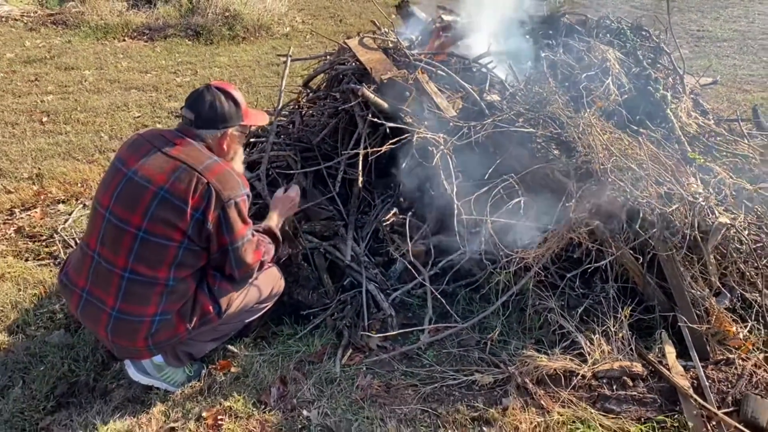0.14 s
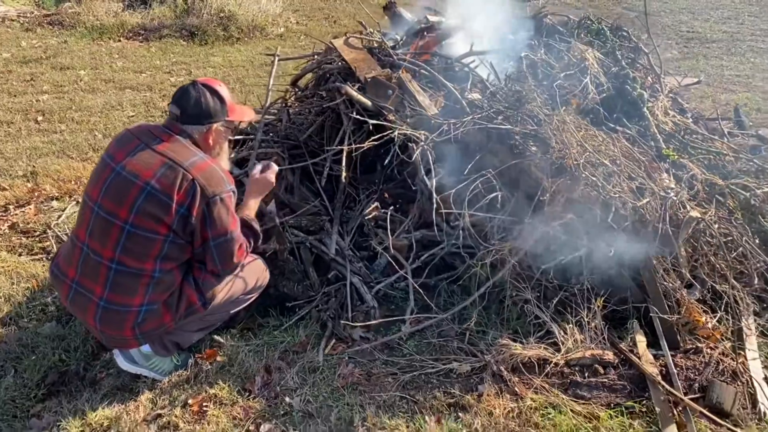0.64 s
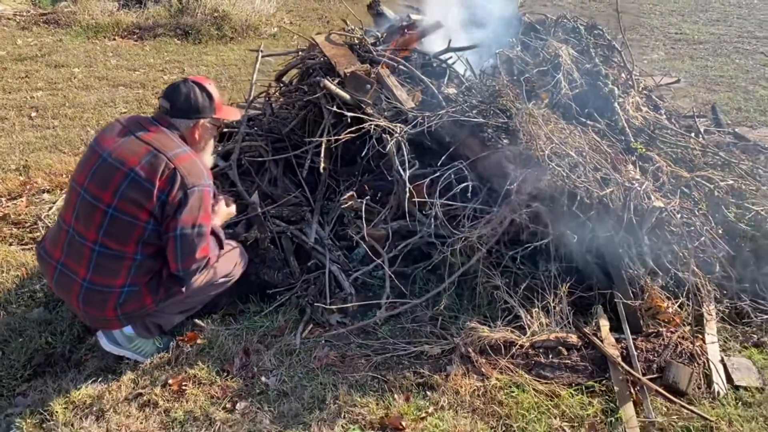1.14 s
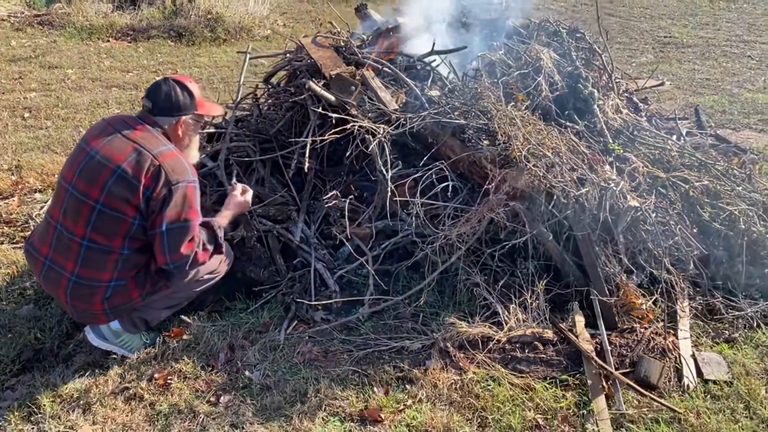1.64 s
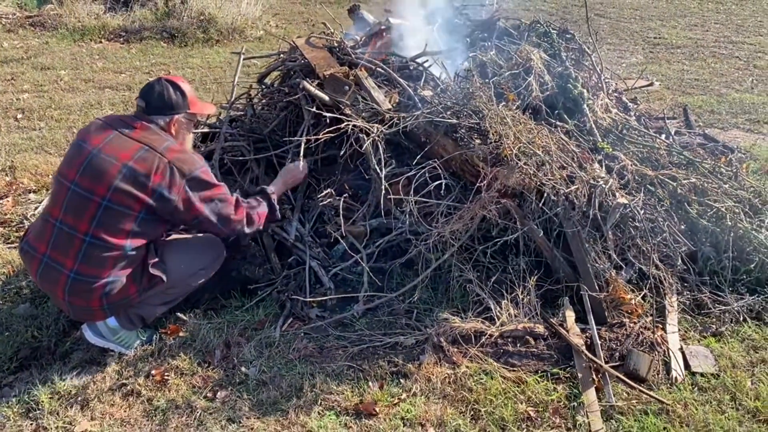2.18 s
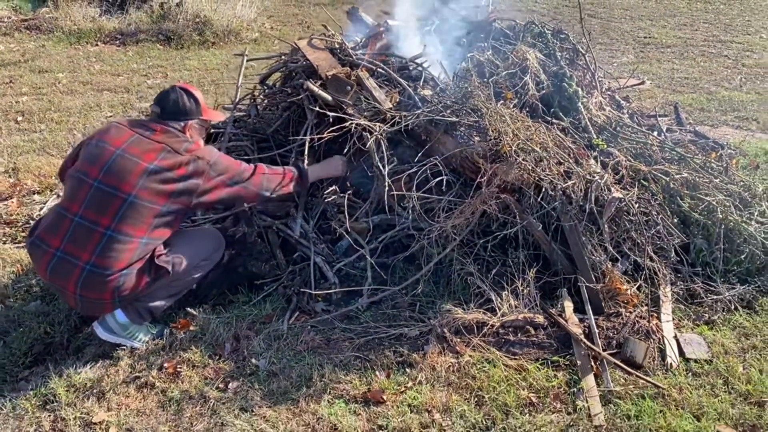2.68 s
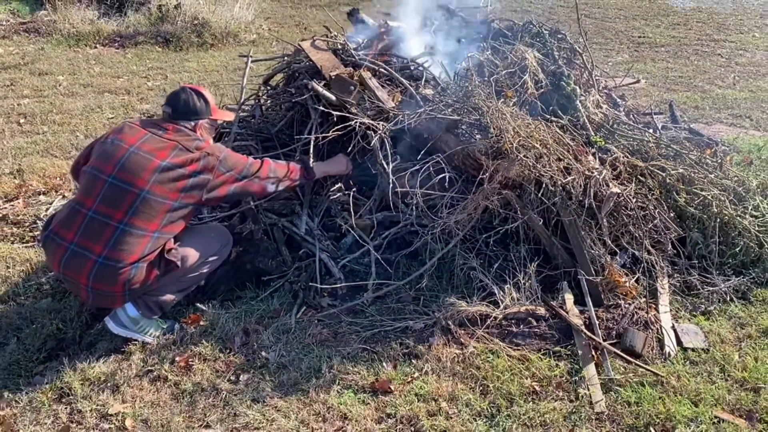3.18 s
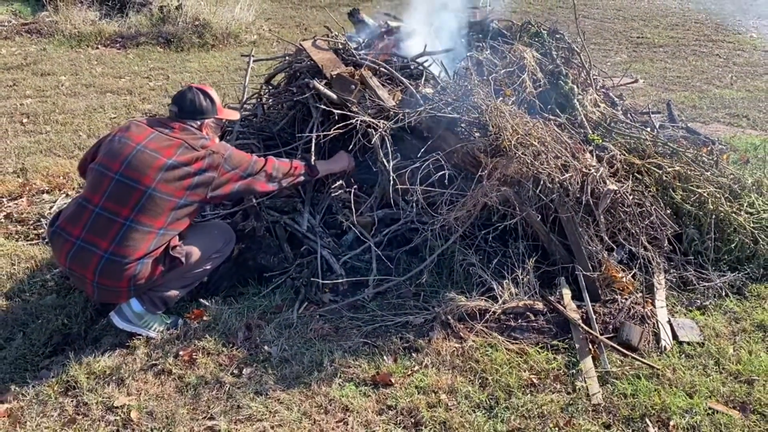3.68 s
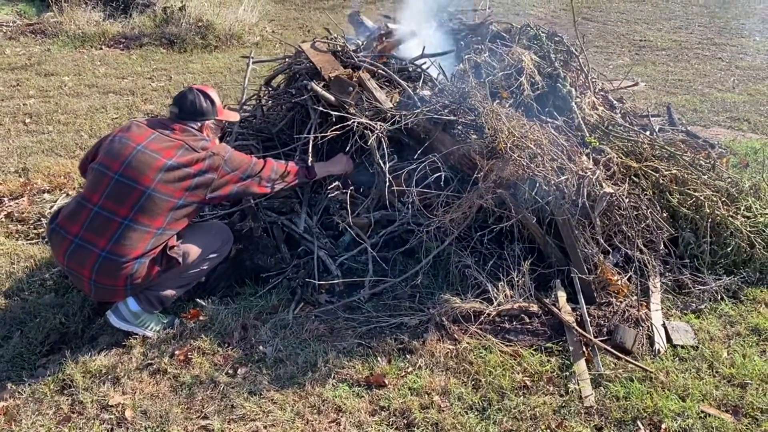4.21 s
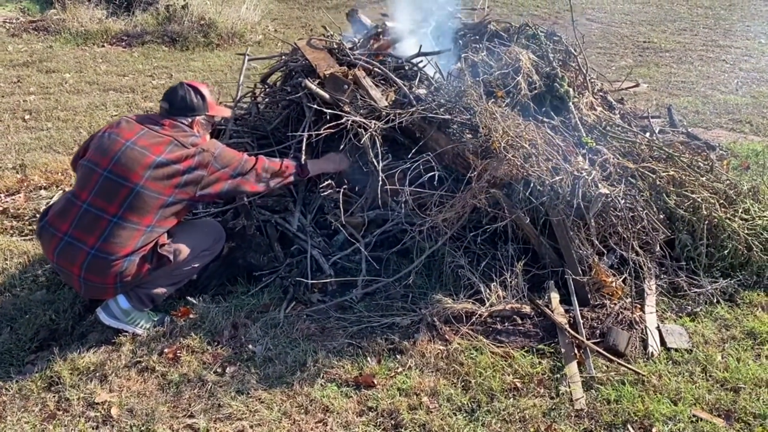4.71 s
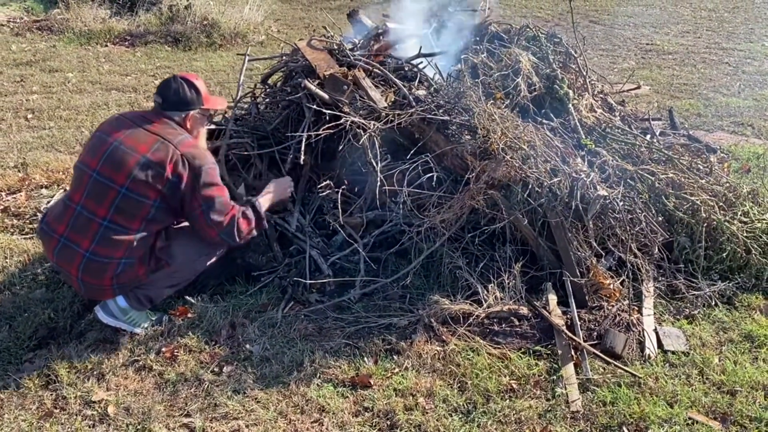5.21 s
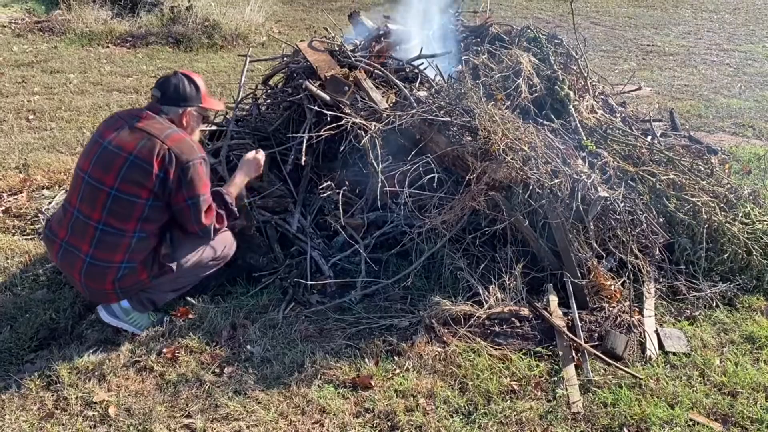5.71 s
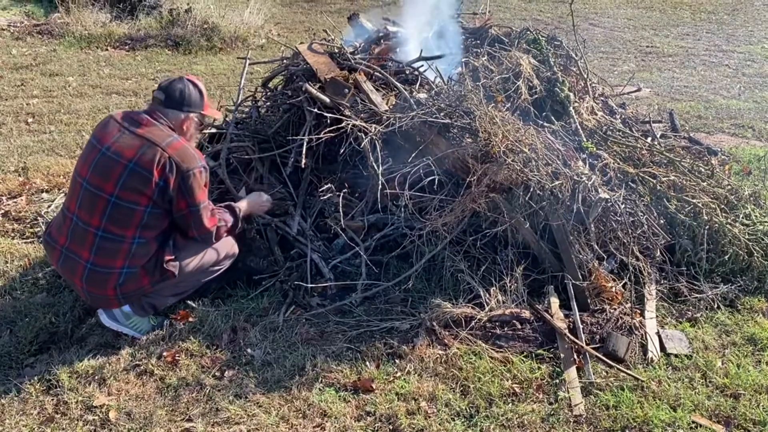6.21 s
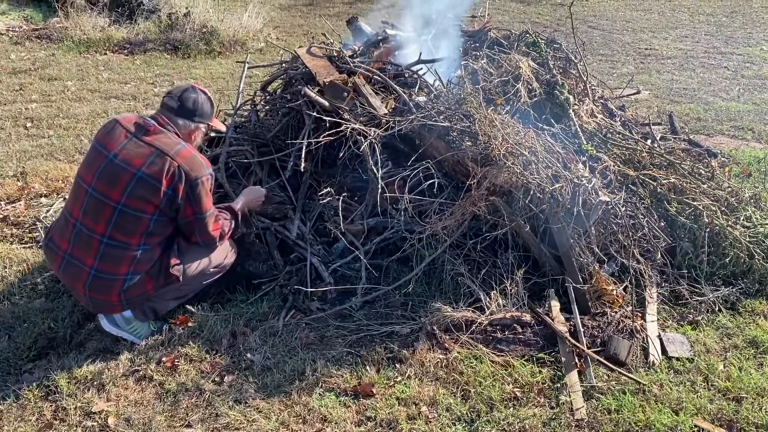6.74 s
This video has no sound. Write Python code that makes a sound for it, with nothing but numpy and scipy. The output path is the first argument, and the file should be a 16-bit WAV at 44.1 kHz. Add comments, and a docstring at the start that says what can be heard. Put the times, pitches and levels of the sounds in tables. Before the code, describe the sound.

A brush pile of dry twigs smoulders in an open grassy place, heard a few metres away through a phone's stereo microphones. Low wind rumble and a wavering distant engine drone lie under faint rustle, fine sizzle and a very high airy hiss. Sharp pops cluster at once, the strongest near 0.45 seconds, with another bright snap at 1.6. Wind thumps bump the microphone at 0.1, 0.5 and 1.6 to 1.9. A faint, rapid insect trill ticks from 1.6 to 2.6. Small irregular snaps continue; twigs scrape softly around 3.7 to 4.1 with a thin hiss, and clearer cracks land at 4.0 and 5.2. The engine sinks in pitch and disappears by 5.9. At 6.1 a stick thuds dully with a loose rattle and a light wind bump, then insect ticking returns over sparse crackles to the end at about 6.9.

```python
"""Dry twigs burn in a pile a few metres from a phone: sharp pops, bursts through wood resonances,
over sizzle, rustle and crackle of shaped noise and grains. A distant engine, two wavering tones,
drones then drops away. Wind rumbles as low noise and thumps as slowing swings; an insect trills in
high ticks over a high meadow hiss. From the middle on, twigs scrape and thin hisses come and go;
near the end a stick thuds."""
import sys
import numpy as np
from scipy import signal
from scipy.fft import rfft, irfft
from scipy.io import wavfile
from scipy.ndimage import uniform_filter1d

SR = 44100
rng = np.random.default_rng(int(sys.argv[2]) if len(sys.argv) > 2 else 0)


def file_out(sig):
    """Save sig as 16-bit WAV at sys.argv[1]."""
    # one column per channel
    cols = np.atleast_2d(sig).T
    # limit, then scale
    lim = np.clip(cols, -1, 1)
    pcm = np.round(lim * 32767).astype(np.int16)
    wavfile.write(sys.argv[1], SR, pcm)


def linear_from_db(decibels):
    """Turn decibels (scalar or array-like) into linear amplitude factors; 0 gives 1."""
    return 10 ** (np.asarray(decibels, float) / 20)


N = 302526

# twig pops: start_s, crack_peak_db, knock_over_crack_db (twig thickness), spit_over_crack_db (sap)
POPS = [(0.027, -44, -3, -8), (0.1412, -37.5, -7.5, -17), (0.3068, -47, -4, -14), (0.39, -61.5, 3, 2),
        (0.4305, -26.5, -2.5, -10), (0.4756, -18.5, -8, 3.5), (0.5152, -47, -6, -11),
        (0.5359, -28, -10, -4), (0.5835, -47.5, -6, 2), (0.651, -59.5, 4, -17), (0.6773, -54, -5, -19),
        (0.9153, -64, 4, -11), (0.9748, -61, 7, -6), (1.0105, -55, -5, -4), (1.0834, -53.5, 0.5, -2),
        (1.1017, -51, -6, -1), (1.258, -52, -12, 0), (1.277, -36.5, -11.5, -17), (1.3027, -51, -4, -17),
        (1.5692, -39.5, -4, -3), (1.5825, -25, -8.5, -4), (1.6501, -52, -5, -6), (1.7765, -53, -12, -7),
        (1.8439, -53, -24, 3), (1.919, -69.5, 7.5, 4), (1.9467, -56, -14, -3), (2.0343, -44, -13, 9),
        (2.2004, -51.5, 2, -12), (2.2198, -56.5, -0.5, 1), (2.4843, -58, 5.5, 9), (2.5901, -42.5, -6, -11),
        (2.6584, -50, -4.5, 1), (2.7087, -52, -6, -2), (2.9562, -49, -2, -7), (2.989, -47.5, -5.5, -8),
        (3.1693, -57.5, -29, 5), (3.3712, -50, -9.5, -2), (3.4099, -46.5, -10, -3), (3.6196, -56, 10, -2),
        (3.6891, -54, -10, 4), (3.7125, -42, -11, 1), (3.8069, -46, -15, -3), (3.9663, -48.5, -2, -6),
        (3.999, -34, -7, -19), (4.0714, -55, -2, -1), (4.0996, -44.5, -12, 4), (4.141, -54.5, -5.5, -19),
        (4.2411, -43, 1, -26), (4.445, -47, 1.5, 0), (4.5915, -55, -11, 6), (4.6034, -42.5, -13, -2),
        (4.6239, -39, -5, 2), (4.7334, -49, -6, -19), (5.0919, -47, -20, -11), (5.1903, -28, -8, -10),
        (5.258, -55, -9, -10), (5.2934, -47.5, -11, -3), (5.4254, -55.5, 6, -15), (5.5832, -55.5, -4, -16),
        (5.7671, -56.5, 6, -6), (5.79, -47.5, -12, -20), (5.8351, -54, -0.5, -19), (5.8523, -45, -2, -18),
        (5.937, -44.5, -10, 0), (6.1975, -38.5, -3, -1), (6.2365, -51.5, -6, -14), (6.422, -64.5, 4, -5),
        (6.6124, -51, -17, -10), (6.6485, -58, 1, -5), (6.6968, -56, -1.5, -3), (6.7262, -53, -17, -4.5)]
# wood and sap resonances, before ring() sharpens and varies them: centre_hz, width_hz, level_db
KNOCK_MODES = [(1347, 590, -0.5), (2256, 660, -0.5), (2640, 420, -2)]
CRACK_MODES = [(3690, 1300, -3.5), (5400, 1340, 0.5), (7950, 1780, 1.5), (10570, 2300, -1),
               (14800, 2600, -6)]
SPIT_MODES = [(13100, 1640, -6), (14030, 1260, -1)]
BRANCH_MODES = [(720, 480, 0)]  # thick wood
# background spectra, relative: freq_hz, density_db (per Hz)
RUMBLE_COLOUR = [(24, -26.5), (36, -9), (52, 8), (85, 8.5), (130, 2), (200, -8.5), (320, -22), (520, -30),
                 (800, -58)]
RUSTLE_COLOUR = [(180, -14), (300, -2.5), (493, -14.5), (704, -10), (1350, -17), (1450, -18), (2070, -24),
                 (3400, -34), (4420, -45), (7480, -120)]
SIZZLE_COLOUR = [(1600, -32), (2600, -2.5), (3100, -15), (5000, -8), (7600, -12.5), (10600, -15.5),
                 (12000, -39), (13300, -8.5), (14800, -5), (15700, -7.5), (16400, -33)]
MEADOW_COLOUR = [(11800, -46), (13200, -24.5), (14700, -2), (15600, -2), (16400, -31)]
# wind rumble: time_s, level_db
GUST = [(0.0, -44.5), (0.42, -45), (3.06, -48), (3.86, -45), (4.26, -48), (5.2, -47), (5.92, -49),
        (6.86, -45.5)]
# fire liveliness: time_s, sizzle_db
FLAMES = [(0.0, -78), (0.53, -78.5), (0.69, -84), (1.83, -84), (2.35, -86), (2.54, -78.5), (2.77, -89.5),
          (3.04, -83), (3.65, -89), (3.82, -78), (3.93, -78.5), (4.3, -82.5), (4.62, -77.5), (4.79, -85.5),
          (5.04, -82), (5.25, -81), (6.46, -85.5), (6.86, -87)]
# engine: time_s, firing_hz, level_db, third_multiple_db
ENGINE = [(0.0, 70.19, -41.5, -64), (0.66, 70.11, -38, -57), (1.22, 78.03, -38.5, -65.5),
          (1.87, 75.67, -40.5, -59), (2.53, 67.5, -39, -65.5), (3.708, 66.44, -42.5, -71),
          (4.599, 72.3, -38.5, -67.5), (5.26, 71.63, -37.5, -64), (5.9, 50.2, -65, -79)]
# wind thumps: start_s, peak_db, start_hz, length_ms, left_minus_right_db
THUMPS = [(0.127, -21.5, 179.3, 51.5, 3), (.520, -21.5, 135.4, 43, 3.5), (1.608, -26, 120, 53, 4),
          (1.655, -29, 100, 35, -3.5), (1.707, -25, 94, 38, 5), (1.778, -33, 68, 42, 9.5),
          (1.816, -29, 90, 29, 6), (1.848, -29, 135, 25, 5), (6.125, -32, 178.6, 42.5, 1)]
# insect trills: start_s, end_s, first_rate_per_s, last_rate_per_s, typical_tick_db
TRILLS = [(1.637, 2.57, 46.3, 38, -56.5), (6.047, 6.886, 43, 45.3, -53)]
# soft dull tick, then twigs being moved: start_s, length_s, peak_level_db
STIRS = [(3.012, 0.04, -65), (3.642, 0.13, -64), (3.798, 0.32, -65)]
# thin hisses: start_s, length_s, pitch_hz, peak_level_db (before flutter)
WHISTLES = [(3.80, .07, 3950, -75), (5.24, .16, 2600, -79), (6.62, .2, 2600, -84), (6.69, .06, 3950, -78)]
# phone openings: freq_hz, left_lead_rad
PORT_PHASE = [(0, 0.5), (1810, 0), (3100, 0.9), (4820, 1.5), (5170, 2), (5680, 1.25), (6460, -0.5),
              (6800, 2.5), (7840, -3), (8790, 2.5), (11700, -2.5), (13400, -4), (16300, -9.5)]
# phone openings: freq_hz, left_minus_right_db
PORT_BALANCE = [(60, -2), (110, 0), (200, -5), (380, -3.5), (700, -0.5), (1290, 3.5), (2380, 2), (4400, 0),
                (8120, -3.5), (15000, 1)]
# backgrounds: freq_hz, shared_power_fraction (0-1)
LIKENESS = [(60, 1), (130, 0.97), (290, 0.29), (640, 0), (1410, 0.05), (3100, 0), (6820, 0), (15000, 0.17)]

CALM_DB, MEADOW_DB = -83, -93.5  # sizzle of an average moment; high hiss
RUSTLE_DB, RUSTLE_DB_PER_DB = -74, 0.36  # average moment; slope on sizzle
CRACKS_PER_S, CRACKS_DB_PER_DB = 130, 0.4  # average moment; rate in dB per dB of sizzle
FLARE_DB, FLARES_PER_S = 1.5, 18  # quick clumps in the sizzle
BRANCH_DB, BRANCH_DB_PER_DB = -4.5, 1.9  # over the crack at thickness 0; slope on thickness
THUD_S, THUD_PEAK_DB = 6.130, -40.5
T = np.arange(N) / SR
HZ = np.fft.rfftfreq(N, 1 / SR)


def along(table, hz):
    """Reads (Hz, value) points on a log-frequency axis."""
    f, v = np.transpose(table)
    return np.interp(np.log(hz + 1), np.log(np.maximum(f, 0) + 1), v)


def over_time(table):
    """Reads (s, value) points at every sample."""
    return np.interp(T, *np.transpose(table))


def unit(x):
    """Scales to rms 1."""
    return x / np.sqrt(np.mean(x ** 2))


def bandpass(x, lo_hz, hi_hz, order):
    """Keeps lo to hi."""
    sos = signal.butter(order, [lo_hz, hi_hz], "band", fs=SR, output="sos")
    return signal.sosfilt(sos, x)


def walk(rate_per_s):
    """Random levels held 1 / rate s and slewed twice; spread near 1."""
    hold = int(SR / rate_per_s)
    steps = np.repeat(rng.standard_normal(N // hold + 1), hold)
    return 2.08 * uniform_filter1d(uniform_filter1d(steps, hold), hold)[:N]


def swell(start_s, length_s):
    """Half-sine rise and fall, peak 1."""
    return np.sin(np.pi * np.clip((T - start_s) / length_s, 0, 1))


def ports(x):
    """One sound at the phone's two openings: each hears it with its own level and phase."""
    half = linear_from_db(along(PORT_BALANCE, HZ) / 2) * np.exp(0.5j * along(PORT_PHASE, HZ))
    spectrum = rfft(x)
    return np.array([irfft(spectrum * half, N), irfft(spectrum / half, N)])


def spread(x, other, colour):
    """Colours a background: one part common to both openings, the rest unrelated left and right."""
    like = np.clip(along(LIKENESS, HZ), 0, 1)
    gain = linear_from_db(along(colour, HZ))
    shared = ports(irfft(rfft(x) * gain * np.sqrt(like), N))
    return shared + irfft(rfft(other) * gain * np.sqrt(1 - like), N)


def bed(colour, lo_hz, hi_hz, level_db, grains=0):
    """Noise plus grains from the pile; the band lo-hi sets the level."""
    x = spread(rng.standard_normal(N), rng.standard_normal((2, N)), colour)
    coloured_grains = irfft(rfft(grains + np.zeros(N)) * linear_from_db(along(colour, HZ)), N)
    x = x + ports(coloured_grains)
    band = bandpass(x.mean(axis=0), lo_hz, hi_hz, 4)
    return x * linear_from_db(level_db) / np.sqrt(np.mean(band ** 2))


def wind():
    """Low turbulent rumble, rising and falling with the gusts."""
    return bed(RUMBLE_COLOUR, 90, 190, over_time(GUST) + 0.8 * walk(14))


def crackle(rate_per_s, size_db, scatter_db):
    """Small cracks at random moments, many faint and few loud: noise decaying in 0.57 ms."""
    when, big = rng.random(N), rng.exponential(1, N)
    hits = (when < rate_per_s / SR) * linear_from_db(size_db + np.minimum(scatter_db * big, 14.0))
    decay = np.exp(-1 / (0.00057 * SR))
    return signal.lfilter([1], [1, -decay], hits) * rng.standard_normal(N)


def fire():
    """Twig rustle and fine sizzle share their cracks, rubbing and flares; both follow the flames."""
    sizzle_db = over_time(FLAMES)
    lively_db = sizzle_db - CALM_DB
    flare_db = 1.2 * walk(25)
    small = crackle(CRACKS_PER_S * linear_from_db(CRACKS_DB_PER_DB * lively_db), 10.0, 3.0)
    rubbing = crackle(260, 7.0, 3.0)
    rustle_db = RUSTLE_DB + RUSTLE_DB_PER_DB * lively_db + flare_db
    rustle = bed(RUSTLE_COLOUR, 788, 1800, rustle_db, 0.25 * small + 0.34 * rubbing)
    sizzle_db = sizzle_db + flare_db + FLARE_DB * walk(FLARES_PER_S)
    sizzle = bed(SIZZLE_COLOUR, 4900, 8400, sizzle_db, 0.8 * small + 0.27 * rubbing)
    return rustle + sizzle


def meadow():
    """High hiss that wavers slightly."""
    return bed(MEADOW_COLOUR, 12500, 16200, MEADOW_DB + 0.92 * walk(30))


def engine():
    """A far exhaust: firing tone and its third multiple, wavering as the air moves."""
    s, hz, db, third_db = np.transpose(ENGINE)
    turn = 2 * np.pi * np.cumsum(np.interp(T, s, hz) * (1 + 0.0065 * walk(15))) / SR
    firing = linear_from_db(np.interp(T, s, db) + 0.5 * walk(16)) * np.sin(turn)
    third = linear_from_db(np.interp(T, s, third_db) + 0.61 * walk(2.9)) * np.sin(3 * turn)
    fade = np.clip((s[-1] - T) / 0.13, 0, 1)
    return np.sqrt(2) * fade * (firing + third)  # levels are rms


def ring(burst, modes, chance):
    """A burst through broad resonances that sit a little differently in every twig; peak 1."""
    f = np.fft.rfftfreq(len(burst), 1 / SR)
    gain = 0
    for k, ((hz, width, db), (shift, size)) in enumerate(zip(modes, chance)):
        centre = hz * (1 + 0.05 * shift)
        height = linear_from_db(db + 1.8 * size)
        mode = height * 1j * f * width / (centre ** 2 - f ** 2 + 1j * f * width)
        gain = gain + (-1) ** k * mode  # alternate signs leave no gap between neighbours
    out = irfft(rfft(burst) * gain * np.abs(gain) ** 0.3, len(burst))  # sharpened
    return out / np.abs(out).max()


def pops():
    """Steam bursts a twig: a few ms of splintering, then a faint scatter off pile and ground."""
    size = 2048
    out, t = np.zeros(N + size), np.arange(size) / SR
    noise = rng.standard_normal((len(POPS), 2, size))
    chance = rng.standard_normal((len(POPS), 4, 5, 2))
    for (s, crack_db, thick_db, sap_db), (a, b), rows in zip(POPS, noise, chance):
        knock_db = crack_db + thick_db
        branch_db = crack_db + BRANCH_DB + BRANCH_DB_PER_DB * thick_db
        spit_db = crack_db + sap_db
        hold_s = 0.004 * linear_from_db(0.027 * (max(crack_db, knock_db) + 25.5))  # big pops last longer
        splinter = a * np.minimum(t / 0.00056, 1) * np.exp(-(t / hold_s) ** 2.4)
        scatter = linear_from_db(-13) * b * np.minimum(t / 0.001, 1) * np.exp(-(t / (2.1 * hold_s)) ** 2)
        i = int(s * SR)
        levels_db = (crack_db, branch_db, knock_db, spit_db)
        parts = (CRACK_MODES, BRANCH_MODES, KNOCK_MODES, SPIT_MODES)
        for db, modes, row in zip(levels_db, parts, rows):
            out[i:i + size] += linear_from_db(db) * ring(splinter + scatter, modes, row)
    return out[:N]


def thumps():
    """An eddy passes the openings: a few steep swings that slow down as it leaves."""
    out = np.zeros((2, N))
    for s, db, hz, ms, pan_db in THUMPS:
        u = np.clip((T - s) * 1000 / ms, 0, 1)
        turn = 2 * np.pi * hz * ms / 1000 * (u - 0.39 * u ** 2)
        swing = np.sin(turn) + 0.24 * (1 - u) * np.sin(2 * turn)
        sides_db = db + np.array([[pan_db], [-pan_db]]) / 2
        out += linear_from_db(sides_db) * np.sin(np.pi * u) ** 1.42 * swing
    return out


def insect():
    """Regular wing strokes, each a short 14.4 kHz tick and a second, usually weaker one."""
    clicks = np.zeros(N + SR)
    for start, end, first, last, db in TRILLS:
        t = np.arange(start, end, 1 / SR)
        strokes = np.cumsum(np.interp(t, [start, end], [first, last])) / SR
        at = int(start * SR) + np.r_[0, np.flatnonzero(np.diff(strokes // 1))]
        a, b, late = rng.standard_normal((len(at), 3)).T
        gap_s = 0.0035 + 0.0004 * np.clip(late, -2, 2)
        clicks[at] += linear_from_db(db + 3.4 * a)
        clicks[at + (SR * gap_s).astype(int)] += linear_from_db(db - 7 + 4.0 * b)
    t = np.arange(-40, 41) / SR
    tick = np.exp(-(t / 0.00022) ** 2) * np.cos(2 * np.pi * 14400 * t)
    return np.convolve(clicks, tick, "same")[:N]


def stirring():
    """A soft dull tick, then twigs scraping past each other: dense dull grains that swell and fade."""
    grains = crackle(350, 12.0, 3.5) + rng.standard_normal(N)
    grains = unit(bandpass(grains, 900, 2300, 2))
    return grains * sum(linear_from_db(db) * swell(s, length) for s, length, db in STIRS)


def whistles():
    """Sap hissing out of a crack at one rough pitch."""
    out = np.zeros(N)
    for s, length, hz, db in WHISTLES:
        hiss = unit(bandpass(rng.standard_normal(N), 0.96 * hz, 1.04 * hz, 2))
        flutter = linear_from_db(3.0 * walk(70))
        out += linear_from_db(db) * flutter * swell(s, length) * hiss
    return out


def thud():
    """A stick drops into the pile: a dull knock and a loose rattle after it."""
    t = np.maximum(T - THUD_S, 0)
    decay = np.exp(-t / 0.002) + 0.3 * np.exp(-t / 0.028)
    knock = bandpass((t > 0) * decay * rng.standard_normal(N), 180, 950, 4)
    return linear_from_db(THUD_PEAK_DB) * knock / np.abs(knock).max()


def scene():
    """Fire, wind, engine and insect at the phone's two openings."""
    backgrounds = wind() + fire() + meadow()
    points = engine() + pops() + insect() + stirring() + whistles() + thud()
    return backgrounds + thumps() + ports(points)


def band_limit(x):
    """A steep low-pass at the top of the band."""
    return signal.sosfilt(signal.butter(12, 16710, fs=SR, output="sos"), x)


def record(dry):
    """The phone's microphones end steeply at 15.9 kHz."""
    steep = signal.ellip(6, 0.3, 40, 15900, fs=SR, output="sos")  # ripple, stopband in dB
    heard = signal.sosfilt(steep, dry)
    return band_limit(heard)


dry = scene()
out = record(dry)
file_out(out)
```